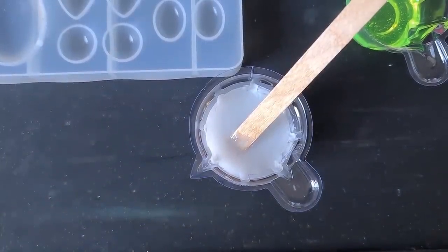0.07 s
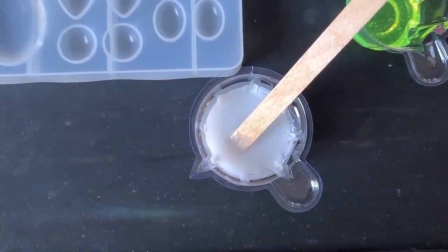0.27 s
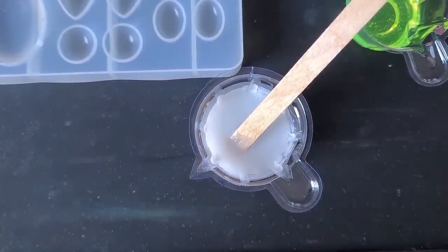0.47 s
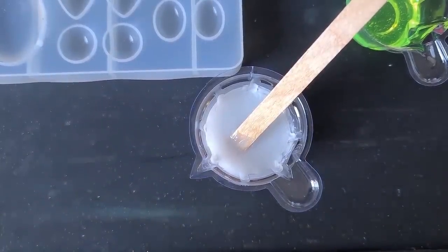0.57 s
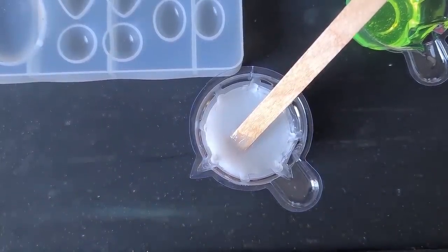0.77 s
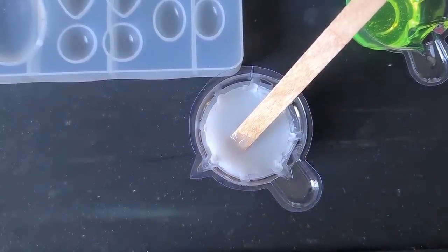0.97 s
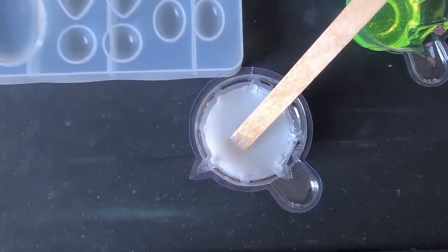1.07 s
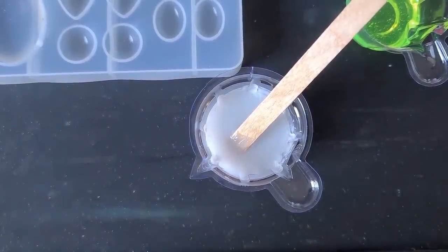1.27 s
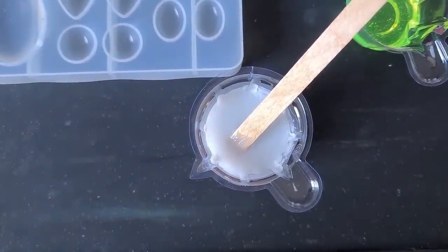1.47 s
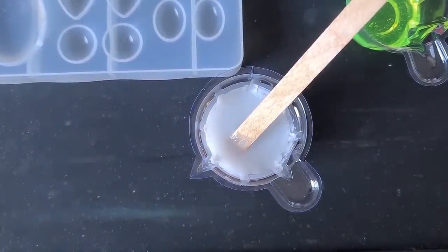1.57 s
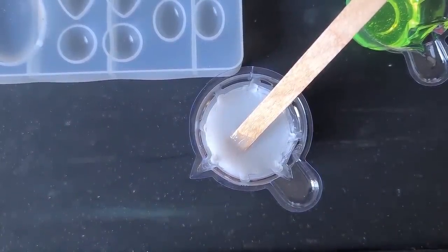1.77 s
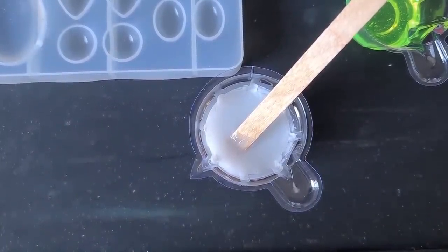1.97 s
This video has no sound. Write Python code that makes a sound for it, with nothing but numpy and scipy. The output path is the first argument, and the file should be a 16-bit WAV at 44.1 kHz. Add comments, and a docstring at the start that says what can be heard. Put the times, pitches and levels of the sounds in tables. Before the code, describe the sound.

A small plastic bottle of liquid is shaken hard from the start until about 2 seconds, just over four shakes a second. A mixing ball clicks against each end in turn and rattles lightly along the wall, while the liquid sloshes and gulps. The loudest hit is a double knock around 1.4 seconds. The bottle sounds close, slightly right of centre, in a small room with faint steady background noise.

```python
"""Shaking a dye bottle

A small plastic bottle is shaken hard, just over four times a second, slightly right of centre.
A mixing ball knocks on each end in turn and rattles along the wall; the liquid sloshes and gulps
at each turn. A small room answers over a faint steady background."""
import sys
import numpy as np
from scipy import signal
from scipy.fft import rfft, irfft
from scipy.io import wavfile

SR = 44100
rng = np.random.default_rng(int(sys.argv[2]) if len(sys.argv) > 2 else 0)


def put_to_file(sound):
    """Save the sound as 16-bit audio at rate SR, in the file named by the first command-line argument."""
    columns = np.atleast_2d(sound).T  # one column per channel
    safe = np.clip(columns, -1, 1)
    whole_steps = np.round(safe * 32767)
    wavfile.write(sys.argv[1], SR, whole_steps.astype(np.int16))


N = 88332


def amp(db):
    """Decibels to gain."""
    return 10 ** (np.asarray(db) / 20)


def unit_rms(x):
    """Scale to rms 1."""
    return x / np.sqrt(np.mean(x ** 2) + 1e-20)


def bins_hz(size=2048):
    """FFT bin frequencies."""
    return np.fft.rfftfreq(size, 1 / SR)


def curve(points, hz):
    """Interpolate over log frequency."""
    points_hz, values = np.transpose(points)
    return np.interp(np.log(hz + 1), np.log(points_hz + 1), values)


def shelf(hz, corner_hz):
    """High shelf, 0 to 1."""
    return 1 - 1 / (1 + (hz / corner_hz) ** 4)


def hump(hz, centre_hz, width_oct):
    """Resonance peak of height 1."""
    return np.exp(-.5 * (np.log2((hz + 1) / centre_hz) / width_oct) ** 2)


def impulse(colour_db):
    """Minimum-phase pulse of unit energy."""
    log_gain = np.log(amp(np.r_[colour_db, colour_db[-2:0:-1]]))
    pulse = np.fft.ifft(np.exp(np.conj(signal.hilbert(log_gain)))).real
    return pulse / np.linalg.norm(pulse)


def correlate_with(a, b, correlation):
    """Blend independent noises into one partly like a."""
    return correlation * a + np.sqrt(1 - correlation ** 2) * b


def pan(left, right, left_db, lag_s):
    """Source on the right: left channel softer and later."""
    delayed = np.r_[np.zeros(round(lag_s * SR)), left][:len(left)]
    return np.array([amp(left_db) * delayed, right])


def add(mix, time_s, sound):
    """Mix in at time_s."""
    part = mix[:, round(time_s * SR):][:, :sound.shape[1]]
    part += sound[:, :part.shape[1]]


# background spectrum (frequency [Hz], relative density [dB])
BACKGROUND_COLOUR = [(15, -6), (60, 6), (125, -3.5), (400, -6.5), (800, -12), (2000, -12), (5000, -17),
                     (9000, -29), (16000, -29)]


def background(level_db=-62, left_db=-.5):
    """Steady low rumble and faint hiss of the room."""
    gain = amp(curve(BACKGROUND_COLOUR, bins_hz(N)))
    right, other = unit_rms(irfft(rfft(rng.standard_normal((2, N))) * gain, N))
    left = amp(left_db) * correlate_with(right, other, .57)
    return amp(level_db) * np.array([left, right])


LIQUID_LEFT_DB, LIQUID_LAG_S = -3.5, .00017
# splash spectrum (frequency [Hz], relative level [dB])
SPLASH_COLOUR = [(100, -14.5), (350, -5), (1700, -3), (2600, -0.5), (4000, -3.5), (6300, -10.5),
                 (8000, -16.5), (16000, -29.5)]
# liquid surges (crest time [s], level [dB], half width [s], treble [dB], gurgle pitch [Hz])
SLOSHES = [(-0.004, -43, 0.026, -0.5, 1650), (0.107, -45, 0.027, -5.5, 930),
           (0.205, -40.5, 0.01, 1.5, 1540), (0.234, -47.5, 0.027, 5, 1290), (0.319, -45.5, 0.02, 9, 1630),
           (0.442, -42.5, 0.013, 0.5, 1570), (0.458, -46.5, 0.02, 10, 2310), (0.558, -43, 0.017, 10.5, 670),
           (0.676, -42.5, 0.013, -1.5, 487), (0.714, -46, 0.01, 6.5, 1230), (0.797, -47, 0.023, 6.5, 870),
           (0.914, -44, 0.01, 1.5, 1680), (0.943, -45, 0.019, 2, 1240), (1.028, -47.5, 0.022, 6, 1060),
           (1.147, -44, 0.016, -4, 1430), (1.185, -42, 0.0089, 12.5, 2060), (1.249, -43, 0.015, 5.5, 790),
           (1.388, -37, 0.014, 8.5, 1200), (1.486, -50.5, 0.036, 3.5, 800), (1.595, -42.5, 0.0055, -3, 625),
           (1.624, -44, 0.02, 2, 1340), (1.705, -49.5, 0.019, -2.5, 1000), (1.834, -38.5, 0.0078, -4, 1160),
           (1.868, -42, 0.011, 2, 1250), (1.942, -52.5, 0.036, 4, 745)]


def slosh(crest_s, level_db, half_width_s, treble_db, gurgle_hz, drops_per_s=2600, spread_db=5):
    """A swell of tiny droplet impacts, coloured by the bottle's air pocket."""
    hz, t = bins_hz(), np.arange(N) / SR
    drops = rng.choice([-1, 1], (2, N)) * (rng.random((2, N)) < drops_per_s / SR)
    drops = drops * amp(spread_db * np.minimum(rng.exponential(1, (2, N)), 4))
    splash_db = curve(SPLASH_COLOUR, hz) + treble_db * shelf(hz, corner_hz=2620)
    gurgle_db = 8 * hump(hz, gurgle_hz, width_oct=.37)
    splash = signal.oaconvolve(drops, impulse(splash_db + gurgle_db)[None], axes=1)[:, :N]
    swell = amp(level_db) * .5 ** (abs((t - crest_s) / half_width_s) ** 1.54)
    right, other = swell * unit_rms(splash)
    return pan(correlate_with(right, other, .29), right, LIQUID_LEFT_DB, LIQUID_LAG_S)


# side-wall contacts (time [s], relative level [dB], wall pitch [Hz], nearer end of swing [in/out])
WALL_GRAZES = [(0.0114, -20, 2100, "out"), (0.2062, -19, 1970, "out"), (0.2451, -18.5, 2250, "out"),
               (0.4794, -25.5, 5100, "out"), (.7168, -23, 2000, "out"), (0.871, -27.5, 2670, "in"),
               (0.9447, -22, 3970, "out"), (0.9574, -26.5, 2600, "out"), (1.1630, -19, 2590, "out"),
               (1.1867, -22, 2800, "out"), (1.239, -22, 4180, "in"), (1.4955, -24, 3100, "in"),
               (1.5967, -29, 6700, "out"), (1.615, -19.5, 1730, "out"), (1.6452, -28, 2500, "out"),
               (1.872, -19.5, 2900, "out"), (1.888, -25, 2540, "out"), (1.9693, -24, 3000, "in")]


def rattle(level_db, wall_hz, end):
    """The ball grazes the side wall in passing: a light, dull knock."""
    return knock(level_db, wall_hz, node_hz=7700, bass_db=0, treble_db=-12.5, end=end)


# air pockets in the dye (time [s], level [dB], start pitch [Hz])
AIR_POCKETS = [(0.026, -44, 295), (.117, -43.5, 650), (0.204, -37, 1155), (.540, -43, 1090),
               (0.67, -31.5, 1670), (.754, -48, 925), (0.813, -51, 1040), (0.9125, -28, 1740),
               (0.914, -41.5, 1100), (1.1447, -36.5, 1416), (1.244, -33.5, 1694), (1.249, -45, 670),
               (1.3735, -26, 1900), (1.3899, -26, 1396), (1.6142, -34.5, 1085), (1.709, -46, 1090),
               (1.831, -38, 1103)]


def gulp(level_db, pitch_hz, crest_s=.0017, glide_per_s=3.3):
    """An air pocket swells and rings for a few milliseconds, rising slightly in pitch."""
    t = np.arange(0, 10 * crest_s, 1 / SR)
    envelope = (t / crest_s * np.exp(1 - t / crest_s)) ** 2
    phase = 2 * np.pi * pitch_hz * t * (1 + .5 * glide_per_s * t)
    ring = amp(level_db) * envelope * np.sin(phase)
    return pan(ring, ring, LIQUID_LEFT_DB, LIQUID_LAG_S)


def wall_pulse(colour_db, delay_at_1khz_s=.00058):
    """A pulse smeared by the wall: bending waves travel slower in the bass."""
    phase_lag = 4 * np.pi * delay_at_1khz_s * np.sqrt(1000 * bins_hz())
    return irfft(rfft(impulse(colour_db)) * np.exp(-1j * phase_lag))


# shell spectrum per end of swing (frequency [Hz], relative level [dB])
SHELL_COLOUR = {"out": [(150, -27.5), (750, -18.5), (1200, -3), (1850, 1), (2800, -3.5), (4100, 1),
                (4900, -5), (6200, -2), (7800, -12.5), (10000, -11), (16000, -23.5)], "in": [(100, -21),
                (450, -12), (1100, -8), (1700, 9), (2700, 4.5), (4700, 1), (6800, -5.5), (11000, -14),
                (16000, -31)]}
# shell ringing relative to the pulse, per end of swing (left [dB], right [dB])
CHATTER_DB = {"out": (-1, -9), "in": (-5, -4)}
# bottle position per end of swing (left minus right [dB], left lag [s])
SWING_PAN = {"out": (-9, .00046), "in": (-1.5, .00018)}
# ball hits on the ends (time [s], relative level [dB], wall pitch [Hz], node pitch [Hz],
# bass [dB], treble [dB], end of swing [in/out])
END_HITS = [(0.0861, -15, 4070, 1460, -11, -11.5, "in"), (.2240, -8.5, 3340, 4600, -1.5, -9.5, "out"),
            (0.32, -13.5, 4360, 3370, 10.5, 0, "in"), (.4562, -7.5, 3100, 4630, -12, -10, "out"),
            (.5560, -14.5, 4230, 3100, 7, 2.5, "in"), (0.6929, -6, 3470, 1810, -1, -15, "out"),
            (0.7969, -14, 4500, 3140, -15, -3, "in"), (0.9285, -7.5, 2970, 5260, -22, -13, "out"),
            (1.0278, -13.5, 3460, 2670, 5.5, -0.5, "in"), (1.2452, -20, 4250, 3230, -2, -13, "in"),
            (1.372, -4, 3200, 2370, -2.5, -13.5, "out"), (1.3920, -5, 3280, 2280, 9.5, 8, "out"),
            (1.6208, -17.5, 3430, 2830, 5, -4.5, "out"), (1.8571, -10.5, 1710, 4680, -14, -14, "out"),
            (1.9569, -16, 3560, 3020, -1.5, -12, "in")]


def knock(level_db, wall_hz, node_hz, bass_db, treble_db, end, chatter_t60_s=.011, gain_db=5):
    """The ball strikes damped plastic: sharp pulse, brief chatter. Rows: left, right, room send."""
    hz = bins_hz()
    # a resonance struck at its node is barely excited
    spot_db = 7.5 * hump(hz, wall_hz, width_oct=.25) - 8.5 * hump(hz, node_hz, width_oct=.1)
    tilt_db = bass_db * (1 - shelf(hz, corner_hz=1160)) + treble_db * shelf(hz, corner_hz=5780)
    shell_db = curve(SHELL_COLOUR[end], hz) + tilt_db
    pulse = wall_pulse(shell_db + spot_db)
    t = np.arange(len(pulse)) / SR
    burst = rng.standard_normal((2, len(t))) * amp(-60 * t / chatter_t60_s) * (t > .0004)
    chatter = signal.fftconvolve(burst, pulse[None], axes=1)[:, :len(t)]
    chatter /= np.linalg.norm(chatter, axis=1, keepdims=True)
    left, right = pulse + chatter * amp(CHATTER_DB[end])[:, None]
    room_send = wall_pulse(shell_db + .5 * spot_db)  # radiated all round: smoother spectrum
    return amp(level_db + gain_db) * np.vstack([pan(left, right, *SWING_PAN[end]), room_send])


# reflection decay (frequency [Hz], T60 [s])
REVERB_T60 = [(1000, 0.2159), (4500, 0.1532), (8000, 0.2), (15000, 0.67)]
# reflection spectrum (frequency [Hz], level [dB])
REVERB_COLOUR = [(200, -37), (1200, -7), (4000, -4.5), (6500, -3.5), (14000, -16)]


def room(send, taps_per_s=5000, predelay_s=.0015, build_s=.013):
    """Dense random reflections, each band decaying at its own rate."""
    taps = rng.standard_normal((2, SR // 2)) * (rng.random((2, SR // 2)) < taps_per_s / SR)
    hz, frame_s, bands = signal.stft(taps, SR, nperseg=256)
    bands = bands * amp(-60 * frame_s / curve(REVERB_T60, hz)[:, None])
    bands /= np.sqrt(np.mean(abs(bands) ** 2))
    bands *= amp(curve(REVERB_COLOUR, hz))[:, None]
    tail = signal.istft(bands, SR)[1]
    tail /= np.sqrt(tail.shape[1] * 256 / 1.5)  # normalise for length and Hann window
    t = np.arange(tail.shape[1]) / SR
    tail *= np.clip((t - predelay_s) / build_s, 0, 1)
    return signal.fftconvolve(send[None], tail, axes=1)[:, :N]


def scene(ball_send_db=-2, crossfade_hz=1.3):
    """Liquid and ball in the room; two reflection patterns slowly crossfade, keeping the tail even."""
    liquid = sum(slosh(*row) for row in SLOSHES)
    ball = np.zeros((3, N))
    for time_s, *row in WALL_GRAZES:
        add(ball, time_s, rattle(*row))
    for time_s, *row in AIR_POCKETS:
        add(liquid, time_s, gulp(*row))
    for time_s, *row in END_HITS:
        add(ball, time_s, knock(*row))
    send = liquid[1] + amp(ball_send_db) * ball[2]  # knocks aim at the microphone: less room
    fade_phase = 2 * np.pi * crossfade_hz * np.arange(N) / SR
    reflections = room(send * np.cos(fade_phase)) + room(send * np.sin(fade_phase))
    return liquid + ball[:2] + reflections + background()


def record(dry, cutoff_hz=16300):
    """Low-pass band limit."""
    lowpass = signal.firwin(255, cutoff_hz, window=("kaiser", 9), fs=SR)
    return signal.oaconvolve(dry, lowpass[None], "same")


dry = scene()
out = record(dry)
put_to_file(out)
```